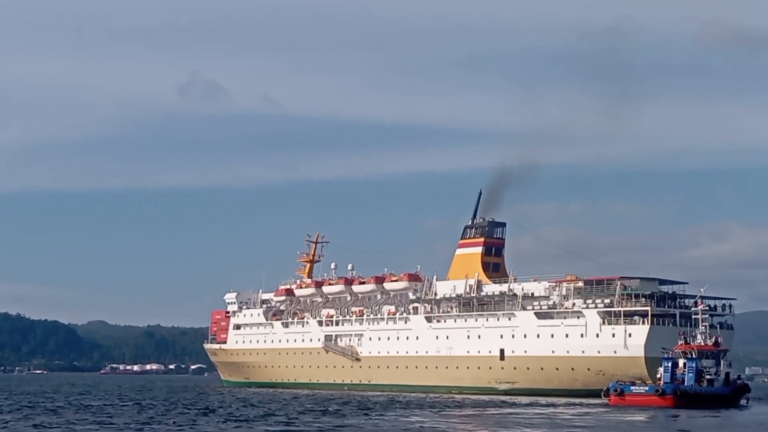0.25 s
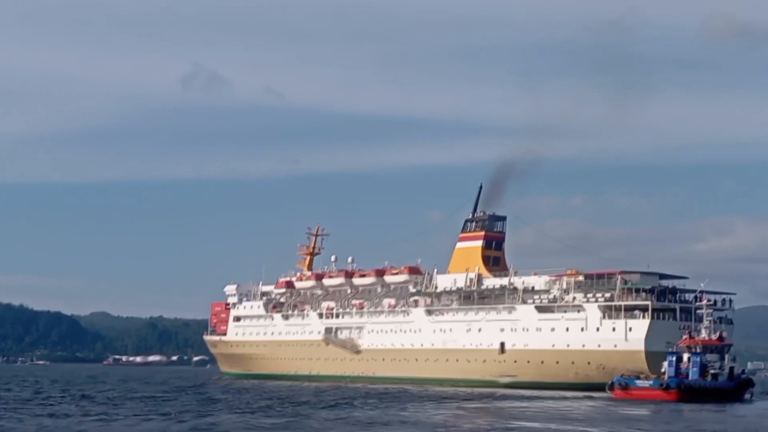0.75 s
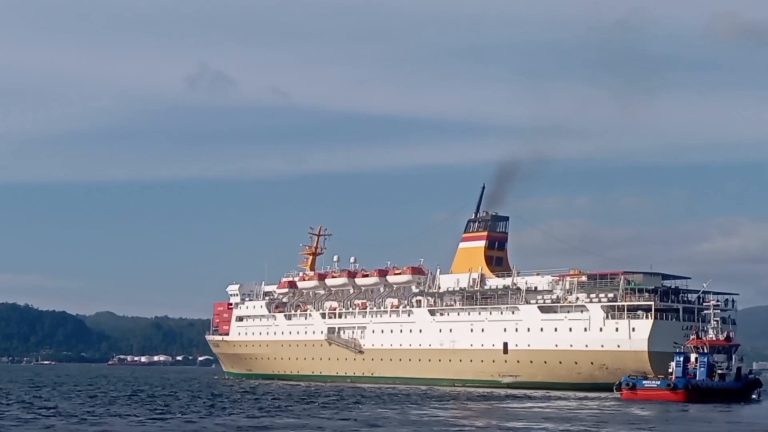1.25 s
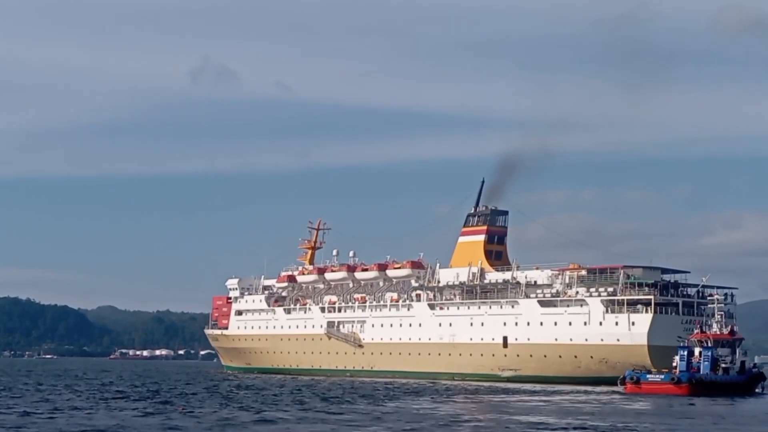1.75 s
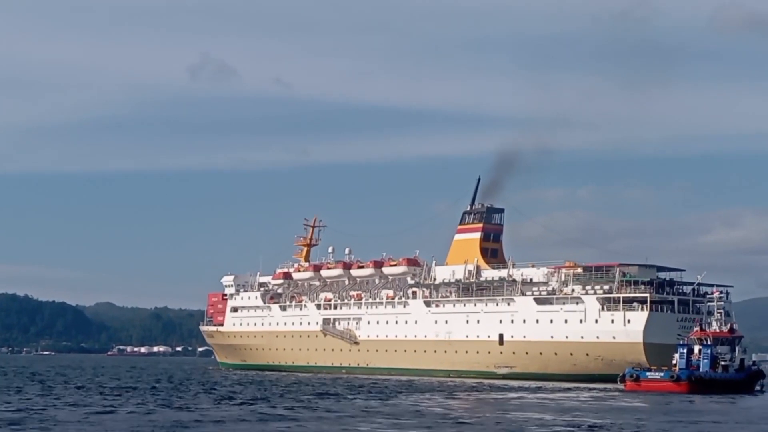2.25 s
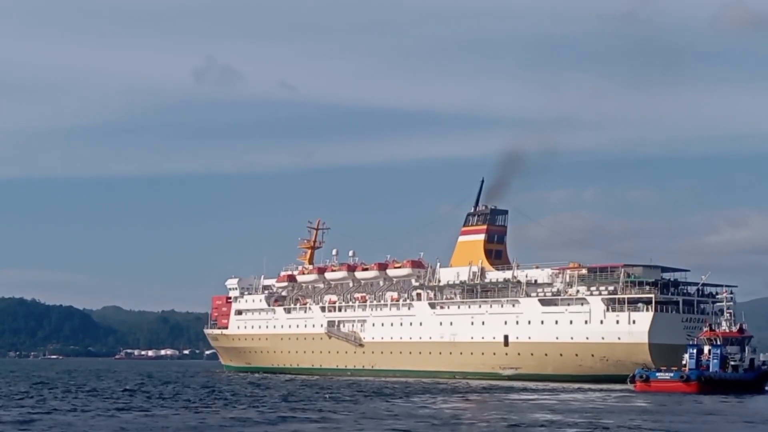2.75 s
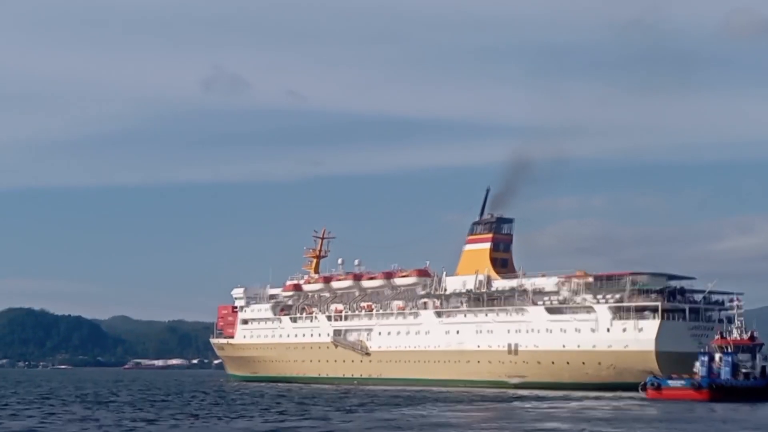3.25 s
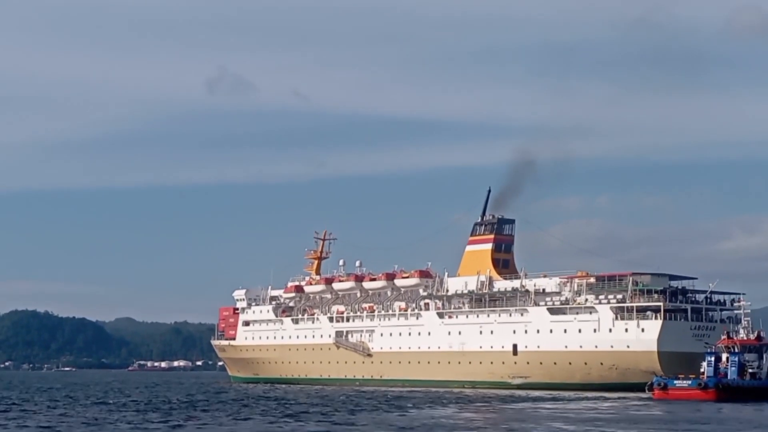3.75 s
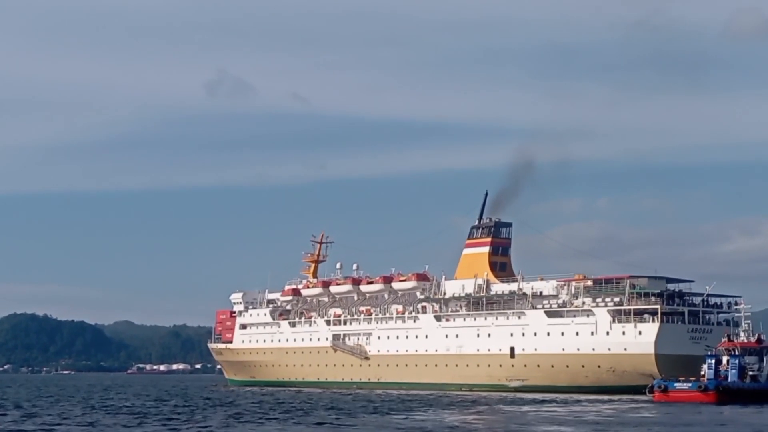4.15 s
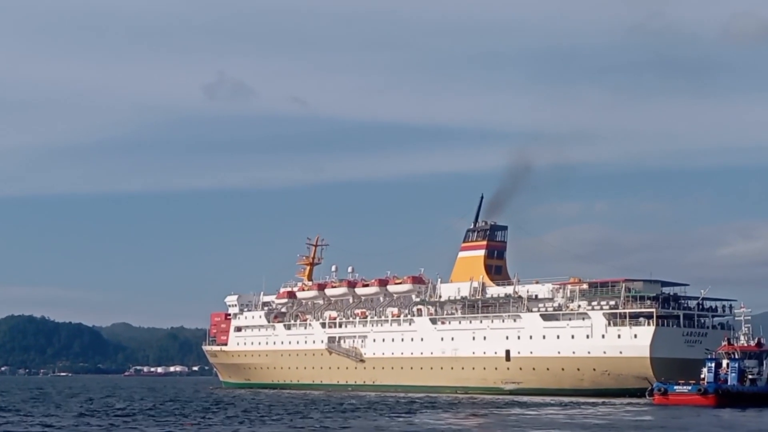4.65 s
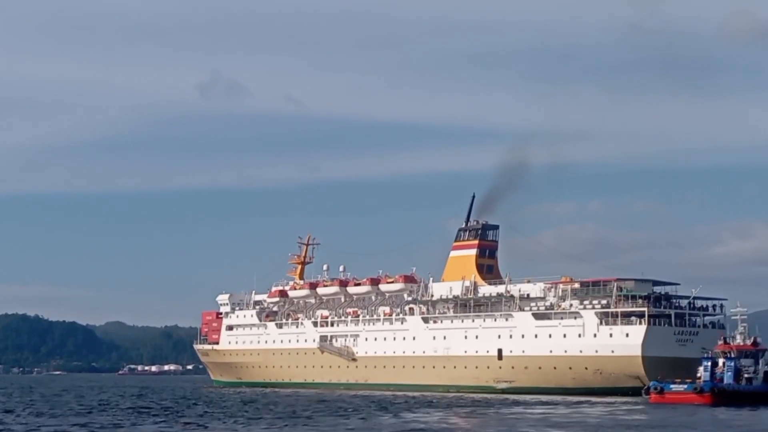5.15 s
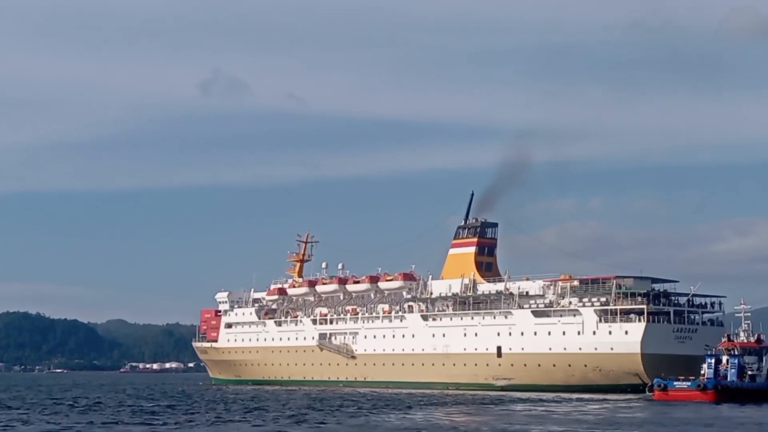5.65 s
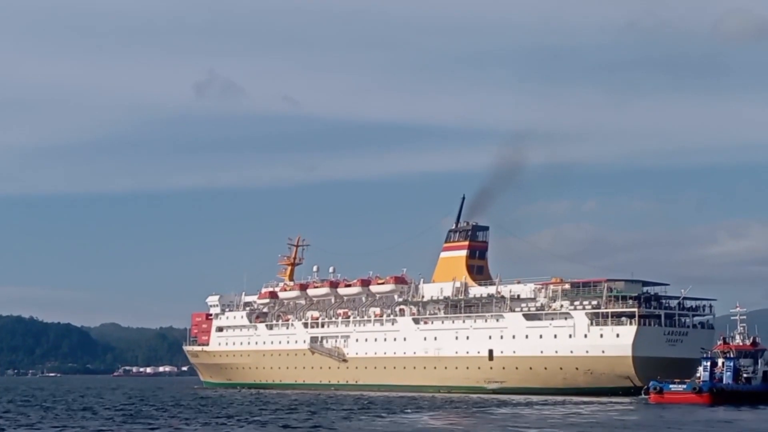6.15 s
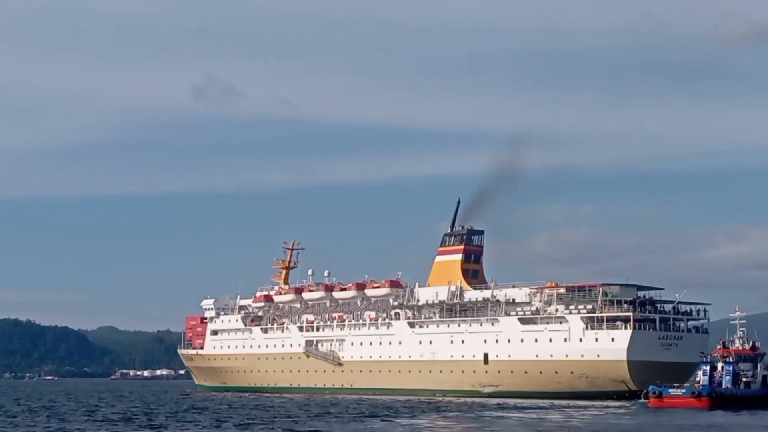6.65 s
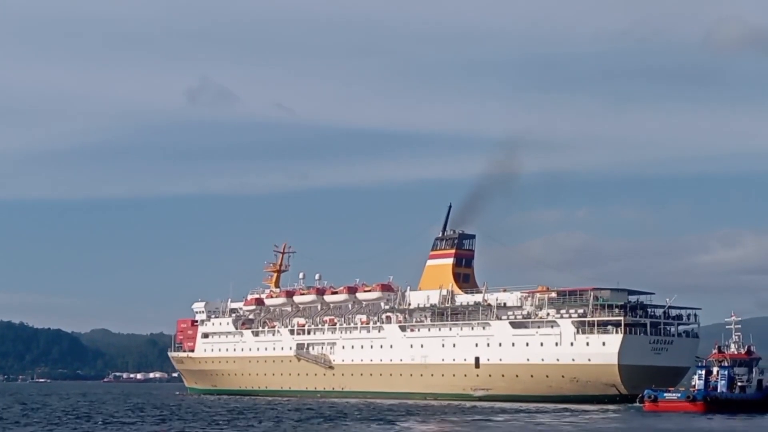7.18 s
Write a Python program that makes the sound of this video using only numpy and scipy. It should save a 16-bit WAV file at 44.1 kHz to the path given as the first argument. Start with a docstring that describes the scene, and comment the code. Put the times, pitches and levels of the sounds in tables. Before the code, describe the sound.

Deep throbbing ship engine drone over water, with small nearby waves breaking in bubbly plops and spatters, and faint low wind on the microphone.

```python
"""Ship, tug and small waves

A large ship and its tug run their diesels across a harbour, heard from the water's edge: filtered noise
makes the rumble, close sine tones beat over it, and more noise makes a distant roar.
Small waves wash in close by, from left and right: each builds, breaks and drains away in bands of
bubble pops, with ringing bubbles, droplet ticks and spatters of noise. Two light gusts of low noise
brush the microphone."""
import sys
import numpy as np
from scipy import signal
from scipy.fft import rfft, irfft, next_fast_len
from scipy.io import wavfile
from scipy.ndimage import map_coordinates

SR = 44100
rng = np.random.default_rng(int(sys.argv[2]) if len(sys.argv) > 2 else 0)


def transcribe(signal):
    """Save signal, clipped to [-1, 1], as a 16-bit WAV file at the path in sys.argv[1]."""
    frames = np.atleast_2d(signal).T
    limited = np.clip(frames, -1, 1)
    pcm = np.round(limited * 32767).astype(np.int16)
    wavfile.write(sys.argv[1], SR, pcm)


N = 327222   # length in samples

# In every table, left-right level is positive to the left; levels come before the trims in scene().
# engine tones: f/Hz, rms level/dB before the level curve
ENGINE_TONES = [(68.6, -62.5), (84.1, -56.5), (87.5, -52), (109.9, -63.5), (137.3, -53.5), (160.5, -53),
                (164.8, -51.5), (174.5, -54.5), (193.5, -57), (211.6, -59), (250.6, -59)]
# colour of the exhaust rumble: f/Hz, relative density/dB per Hz
RUMBLE_COLOUR = [(30, -35), (55, -19), (70, -10), (98, -9.5), (112, -4), (140, -1), (185, 0), (225, -1.2),
                 (280, -3.3), (320, -8), (380, -14.3), (520, -26), (900, -60), (2000, -100)]
# the engines as they carry over the water: t/s, rumble level/dB, change of the tones/dB
ENGINE_LEVEL = [(0, -35.8, -2), (1.7, -34.8, -1), (2.5, -35.6, 0), (3.5, -34, 0), (4.15, -34.3, 1.5),
                (4.85, -37.1, -.7), (6.1, -34.5, .5), (7.42, -33.7, .5)]
# direction of the ship: f/Hz, left-right level/dB
SHIP_SIDE = [(70, 7), (130, 5.3), (250, 3.0), (400, 0.5)]
# brief swells of the rumble: t/s, level/dB, f/Hz
THROBS = [(.29, -34.5, 183), (.63, -38, 269), (1.09, -36.5, 263), (1.53, -34, 160), (1.55, -37.5, 258),
          (1.69, -38, 253), (1.87, -34.5, 161), (2.31, -32, 161), (2.63, -36.5, 240), (3.0, -33.5, 178),
          (3.15, -37.5, 279), (3.24, -33.5, 134), (3.77, -34, 166), (4.14, -33.5, 188), (4.26, -37, 107),
          (5.02, -34.5, 140), (6.01, -34, 139)]
# colour of the distant harbour roar: f/Hz, relative density/dB per Hz
HARBOUR_COLOUR = [(30, -40), (250, -6), (380, -.5), (450, 2), (560, -3.5), (720, -11), (1050, -10),
                  (1350, -15.2), (1750, -17.7), (2300, -29.3), (4500, -34.5), (7000, -39.5), (11000, -45),
                  (14000, -59)]
# loudness of the distant harbour roar: t/s, level/dB
HARBOUR_LEVEL = [(0, -48.5), (2.5, -48), (6.0, -46.2), (7.42, -47)]
# gusts on the microphone: strongest at t/s, rise/s, level/dB
GUSTS = [(3.0, .5, -59.5), (6.2, .95, -52.8)]
# colour of the wind: f/Hz, relative density/dB per Hz
WIND_COLOUR = [(10, -1), (20, 4), (45, -0.5), (90, -6), (200, -23.5), (2000, -110)]
# waves: breaks at t/s, rise/s, hold/s, fall/dB per s, churn level/dB, fizz level/dB, left-right level/dB
WAVES = [(.48, .3, .1, 4, -61, -68, -2.5), (1.66, .45, .17, 24, -41.6, -51.3, -4.2),
         (2.41, .11, .11, 16, -34.7, -47.4, .5), (2.9, .17, .04, 38, -41, -57, .5),
         (3.57, .15, .16, 32, -45.5, -49.4, -4.3), (4.05, .3, .22, 11.5, -45, -56.3, -5.2),
         (5.27, .25, .12, 8, -51.8, -62.5, 1.6), (6.26, .27, .1, 15, -50.5, -58.3, -1),
         (6.64, .29, .15, 16, -44.3, -49.8, -1), (7.08, .3, .15, 6, -43.5, -52.3, -3.5)]
# colour of the wash when churn, fizz and spray are equally strong: f/Hz, relative level/dB
WASH_COLOUR = [(260, -9), (420, 1), (520, 1.2), (680, .3), (1000, 2.6), (1380, -5.5), (1750, -3.2),
               (2250, -9.2), (3200, -5), (4500, -4.8), (6800, -7.4), (9000, -5.6), (11300, -8.8),
               (13300, -25.5)]
# left-right likeness of the water: f/Hz, correlation/1
WATER_LIKENESS = [(400, .88), (1100, 0.88), (2200, .73), (3600, .76), (5500, .56), (8000, .5), (13000, .6)]
# single bubbles and drops: t/s, peak level/dB, f/Hz, 60 dB decay/s
BUBBLES = [(1.673, -36, 3980, .007), (1.691, -33, 810, .04), (1.847, -26.5, 600, .045),
           (2.374, -30, 420, .05), (2.409, -29, 850, .04), (2.541, -26, 1040, .04), (2.909, -21, 630, .022),
           (2.939, -30, 1100, .025), (3.253, -26, 890, .02), (3.551, -33, 1040, .04),
           (3.562, -35, 1560, .035), (3.663, -32, 4000, .01), (3.662, -31, 710, .05),
           (3.680, -31, 1030, .04), (3.710, -36, 3220, .02), (4.911, -48, 4150, .014),
           (5.246, -41, 3100, .012), (5.480, -37.5, 3900, .009), (5.967, -44, 4430, .008),
           (6.387, -34.5, 1300, .035), (6.491, -33.5, 1060, .04), (6.596, -37, 5800, .016),
           (6.600, -36, 3760, .018), (6.704, -34, 800, .04), (6.707, -39, 4570, .02),
           (7.075, -42, 5100, .02), (7.332, -28, 1130, .02)]
# pitch of the air pockets that the waves fold in: t/s, f/Hz
GURGLE_PITCH = [(1.5, 1050), (1.8, 850), (2.46, 820), (2.52, 1150), (2.74, 850), (2.95, 1020)]
# drips near the shore, strongest as the late wave builds and breaks: t/s, level/dB
DRIP_LEVEL = [(0, -67), (1.5, -56), (4.6, -66), (5.1, -56.5), (6.0, -55.5), (6.6, -47), (7.42, -53)]
# slaps and spatters on the shore: t/s, level/dB, 60 dB decay/s, centre f/Hz
SPATTERS = [(.91, -58, .22, 5500), (1.68, -39, .17, 850), (1.856, -49, .08, 3800), (2.21, -51, .22, 5400),
            (2.358, -35.5, .12, 1100), (2.379, -36, .02, 6500), (2.414, -42.5, .2, 4000),
            (2.415, -33.5, .25, 600), (2.505, -33, .2, 1100), (2.908, -36, .06, 650),
            (2.975, -51, .03, 10000), (3.555, -39.5, .1, 1700), (3.650, -45, .17, 5200),
            (3.645, -40, .25, 600), (3.735, -43, .14, 1400), (5.177, -52, .03, 4200),
            (5.352, -58, .05, 10000), (5.404, -42.5, .13, 900), (5.509, -52, .015, 7500),
            (6.515, -45, .06, 4800), (6.590, -41.5, .18, 3700), (6.700, -45, .16, 4400),
            (7.135, -47, .1, 3200)]
# the left port of the microphone is a little brighter: f/Hz, left-right level/dB
PORT_BALANCE = [(1500, 0), (4000, .3), (9000, 1.7)]

# delay of the left port: for water straight ahead, and per dB that it lies to the right
PORT_LAG_S, LAG_S_PER_DB = 1.9e-5, 1.4e-6
# the water between waves laps straight ahead
LAPPING_CHURN_DB, LAPPING_FIZZ_DB = -56.5, -69.7
# big bubbles come a little after the small ones; fine spray keeps in step with the fizz
CHURN_LAG_S, SPRAY_BELOW_FIZZ_DB = .04, 7.2
GUST_HOLD_S, GUST_FALL_DB_PER_S, BREEZE_DB = .2, 7.5, -74.5
CUTOFF_HZ = 14200


def from_db(db):
    """Decibels to gain."""
    return 10 ** (np.asarray(db) / 20)


def rms_one(x):
    """Scale to unit rms."""
    return x / np.sqrt(np.mean(x ** 2) + 1e-20)


def in_time(rows):
    """Each column of a curve at every sample."""
    s, *columns = np.transpose(rows)
    return [np.interp(np.arange(N) / SR, s, c) for c in columns]


def at_hz(points, hz):
    """Read a table on a log-frequency axis."""
    table_hz, values = np.transpose(points)
    return np.interp(np.log(hz + 1e-9), np.log(table_hz), values)


def drift(rate_hz):
    """Slow random wander with spread 1: low-passed noise, drawn at every 40th sample."""
    r = np.exp(-80 * np.pi * rate_hz / SR)
    raw = rng.standard_normal(N // 40 + 2002)
    slow = signal.lfilter([1], [1, -2 * r, r * r], raw)[2000:]   # skip the filter's settling
    return np.interp(np.arange(N) / 40, np.arange(len(slow)), rms_one(slow))


def panned(side_db):
    """Left and right gains for a level difference."""
    return from_db(np.array([[1], [-1]]) * side_db / 2)


def stereo(pair, alike):
    """Two unrelated signals become left and right with a given likeness."""
    alike = np.clip(alike, -1, 1)
    middle = np.sqrt((1 + alike) / 2) * pair[0]
    sides = np.sqrt((1 - alike) / 2) * pair[1] * [[1], [-1]]
    return middle + sides


def shaped(x, gain_at):
    """Filter by a gain given as a function of frequency."""
    size = next_fast_len(N)
    hz = np.arange(size // 2 + 1) * SR / size
    return irfft(rfft(x, size) * gain_at(hz), size)[..., :N]


def noise(colour, alike):
    """Stereo noise of a given colour, rms 1."""
    white = stereo(rng.standard_normal((2, N)), alike)
    return rms_one(shaped(white, lambda hz: from_db(at_hz(colour, hz))))


def swell(peak_s, rise_s, hold_s, fall_db_per_s):
    """Power of a surge: it gains its last 10 dB in the rise time, holds, then dies away evenly in dB."""
    t = np.arange(N) / SR - peak_s
    rise_db = -10 * (np.minimum(t, 0) / rise_s) ** 2
    fall_db = fall_db_per_s * np.maximum(t - hold_s, 0)
    return from_db(rise_db - fall_db) ** 2


def pops(per_s, spread_db):
    """Two random trains of bursting bubbles, many small and few large, with steady mean power."""
    chance = np.clip(per_s / SR, 1e-6, 1)
    side, at = np.nonzero(rng.random((2, N)) < chance)
    sizes = from_db(spread_db * np.minimum(rng.exponential(1, len(at)), 4))
    out = np.zeros((2, N))
    out[side, at] = sizes * rng.choice([-1, 1], len(at)) / np.sqrt(chance[at])
    return rms_one(out)


def engines(tone_db, rumble_db, wander_hz, fading, unsteady_db):
    """Exhaust rumble and engine orders, which fade in and out on their way over the water."""
    rumble, tones = in_time(ENGINE_LEVEL)
    tone_gain = from_db(tones + tone_db)
    rumble_gain = from_db(rumble + rumble_db + unsteady_db * drift(5.0))
    out = rumble_gain * noise(RUMBLE_COLOUR, alike=.82) + throbs(throb_db=-1.6)
    for hz, db in ENGINE_TONES:
        turns = np.cumsum(hz + wander_hz * drift(1.0)) / SR + rng.random()
        tone = from_db(db) * np.sqrt(2) * np.sin(2 * np.pi * turns)
        out = out + tone_gain * tone * (1 + fading * drift(1.4))
    return shaped(out, lambda hz: panned(at_hz(SHIP_SIDE, hz)))


def harbour(unsteady_db):
    """Distant harbour roar: coloured noise whose level wanders a little."""
    level_db = in_time(HARBOUR_LEVEL)[0] + unsteady_db * drift(3.3)
    return from_db(level_db) * noise(HARBOUR_COLOUR, alike=.78)


def wind(flutter_db):
    """Gusts rise out of a faint breeze and rumble almost independently in each port."""
    power = from_db(BREEZE_DB) ** 2
    for s, rise_s, db in GUSTS:
        power = power + from_db(db) ** 2 * swell(s, rise_s, GUST_HOLD_S, GUST_FALL_DB_PER_S)
    strength = np.sqrt(power) * from_db(flutter_db * drift(5.4))
    return strength * noise(WIND_COLOUR, alike=.1) * panned(side_db=3.0)


def surf():
    """Powers of the waves add up to churn dB and fizz dB; direction is their average weighted by fizz."""
    churn, fizz, side = from_db(LAPPING_CHURN_DB) ** 2, from_db(LAPPING_FIZZ_DB) ** 2, 0
    for s, rise_s, hold_s, fall, churn_db, fizz_db, side_db in WAVES:
        churn = churn + from_db(churn_db) ** 2 * swell(s + CHURN_LAG_S, rise_s, hold_s, fall)
        foam = from_db(fizz_db) ** 2 * swell(s, rise_s, hold_s, fall)
        fizz = fizz + foam
        side = side + side_db * foam
    return 10 * np.log10(churn), 10 * np.log10(fizz), side / fizz


def wash(churn, fizz, wash_db, pops_per_s, patchy_db, slosh_db, grain,
         churn_hz=1400, fizz_hz=3200, spray_hz=9000):
    """Clouds of bubbles ring in third-octave size classes; a stronger wave makes more of them."""
    spray = fizz - SPRAY_BELOW_FIZZ_DB
    slosh = slosh_db * drift(14)   # the small bubbles come in clumps
    crowd = pops_per_s * from_db(fizz - np.mean(fizz))
    grain = np.clip(grain, 0, 1)   # share of pops against smooth noise
    edges = 250 * 2 ** (np.arange(19) / 3)
    anchors = np.log([churn_hz, fizz_hz, spray_hz])
    out = np.zeros((2, N))
    for low, high in zip(edges, edges[1:]):
        hz = np.sqrt(low * high)
        # big bubbles follow the churn, small ones the fizz, the finest the spray
        big, small, fine = [np.interp(np.log(hz), anchors, row) for row in np.eye(3)]
        level_db = big * churn + small * (fizz + slosh) + fine * (spray + slosh)
        level_db = level_db + patchy_db * drift(12.5)
        popping = np.sqrt(grain) * pops(crowd, spread_db=3.5)
        bursts = popping + np.sqrt(1 - grain) * rng.standard_normal((2, N))
        band = signal.butter(2, [low, high], "band", fs=SR, output="sos")
        rings = stereo(signal.sosfilt(band, bursts), at_hz(WATER_LIKENESS, hz))
        out += from_db(level_db + at_hz(WASH_COLOUR, hz) + wash_db) * rings
    return out


def bubble(db, hz, t60, rise=.06, pinch_s=.00015):
    """A lone bubble pinches off, rings and climbs in pitch as it nears the surface."""
    t = np.arange(SR // 12) / SR
    envelope = (1 - np.exp(-t / pinch_s)) * from_db(db - 60 * t / t60)
    return envelope * np.sin(2 * np.pi * hz * (t + rise * t * t / t60))


def strays(level_db, centre_hz, octaves, per_s, cycles, spread_db):
    """Rows for bubbles born at random around a pitch; a few are much louder than the rest."""
    rows, draws = [], rng.random((3000, 4))
    for when, size, luck, born in draws:
        if born < per_s * N / SR / len(draws):
            at = int(when * N)
            hz = centre_hz[at] * 2 ** (octaves * (size - .5))
            db = level_db[at] - spread_db * np.log(luck + .02)
            rows.append((at / SR, db, hz, cycles / hz))   # each rings for so many cycles
    return rows


def bubbles(churn, fizz, gurgle_db, crackle_db, crackle_hz):
    """Big bubbles gurgle with the churn, small ones crackle with the fizz, sparse drips plink on their own curve."""
    gurgle_hz, small_hz = in_time(GURGLE_PITCH)[0], np.full(N, crackle_hz)
    drip_db = in_time(DRIP_LEVEL)[0]
    gurgle = strays(churn + gurgle_db, gurgle_hz, octaves=.6, per_s=150, cycles=28, spread_db=1.4)
    crackle = strays(fizz + crackle_db, small_hz, octaves=1.5, per_s=130, cycles=32, spread_db=3.1)
    drips = strays(drip_db, small_hz, octaves=1.2, per_s=32, cycles=36, spread_db=3.0)
    out = np.zeros(N + SR)
    for s, db, hz, t60 in list(BUBBLES) + gurgle + crackle + drips:
        ring, at = bubble(db, hz, t60), round(s * SR)
        out[at:at + len(ring)] += ring
    return out[:N]


def drops(fizz, drop_db, per_s, spread_db, low_hz=3500, high_hz=13000):
    """Falling droplets tick sharply on the surface: single impulses through a bright band."""
    band = signal.butter(1, [low_hz, high_hz], "band", fs=SR, output="sos")
    landings = stereo(pops(np.full(N, per_s), spread_db), alike=.6)
    return from_db(fizz + drop_db) * signal.sosfilt(band, landings + 1e-18)


def throbs(throb_db, spread_s=.032):
    """Now and then the rumble swells for a moment around one pitch: a sine under a bell curve."""
    out = np.zeros(N)
    for s, db, hz in THROBS:
        t = np.arange(N) / SR - s
        near = np.abs(t) < .2
        t = t[near]
        bell = from_db(db + throb_db) * np.exp(-.5 * (t / spread_s) ** 2)
        out[near] += bell * np.sqrt(2) * np.sin(2 * np.pi * (hz * t + rng.random()))
    return out


def spatters(spatter_db, width=1.7, swell=.04, drops_per_s=7000):
    """Thrown water lands in short bursts, dull for a slap and bright for fine spray."""
    out, t = np.zeros((2, N + SR)), np.arange(SR // 4) / SR
    for s, db, t60, hz in SPATTERS:
        low, high = hz / width, min(hz * width, SR / 2 - 1000)
        band = signal.butter(2, [low, high], "band", fs=SR, output="sos")
        droplets = rng.standard_normal((2, len(t))) * (rng.random(len(t)) < drops_per_s / SR)
        burst = rms_one(signal.sosfilt(band, stereo(droplets, at_hz(WATER_LIKENESS, hz))))
        at = round(s * SR)
        landing = 1 - np.exp(-t / (swell * t60))   # a longer splash also takes longer to land
        out[:, at:at + len(t)] += burst * landing * from_db(db + spatter_db - 60 * t / t60)
    return out[:, :N]


def at_ports(water, side_db):
    """Water on the right is louder in the right port and reaches the left one later."""
    left, right = shaped(water * panned(side_db), lambda hz: panned(at_hz(PORT_BALANCE, hz)))
    lag_s = PORT_LAG_S - LAG_S_PER_DB * side_db
    late_left = map_coordinates(left, [np.arange(N) - lag_s * SR], order=5)
    return np.array([late_left, right])


def scene():
    """Ship and harbour far off, water close by, wind on the ports."""
    ships = engines(tone_db=.5, rumble_db=-.7, wander_hz=.2, fading=.3, unsteady_db=.6)
    far = ships + harbour(unsteady_db=.6)
    churn, fizz, side_db = surf()
    waves = wash(churn, fizz, wash_db=11.8, pops_per_s=400, patchy_db=1.5, slosh_db=1.15, grain=.45)
    ringing = bubbles(churn, fizz, gurgle_db=-2.2, crackle_db=3.5, crackle_hz=4300)
    ticks = drops(fizz, drop_db=-11.5, per_s=22, spread_db=3.8)
    water = at_ports(waves + ringing + ticks + spatters(spatter_db=2.0), side_db)
    return far + water + wind(flutter_db=2.0)


def record(dry):
    """A steep elliptic low-pass cuts the top."""
    return signal.sosfilt(signal.ellip(10, .2, 80, CUTOFF_HZ, fs=SR, output="sos"), dry)


dry = scene()
out = record(dry)
transcribe(out)
```